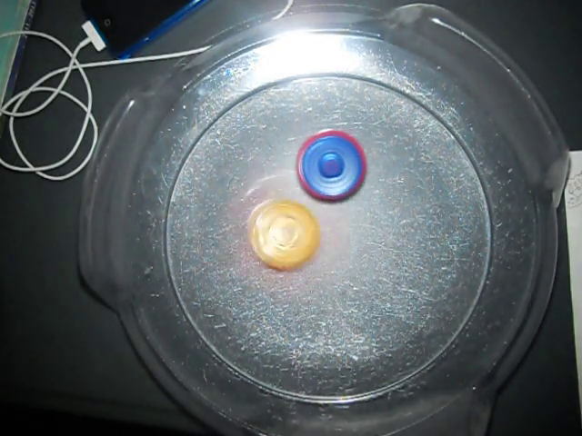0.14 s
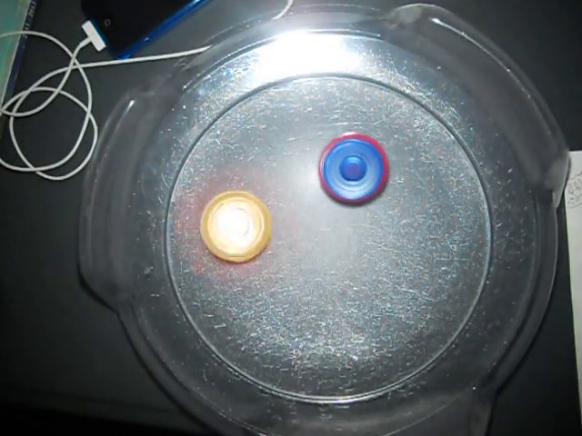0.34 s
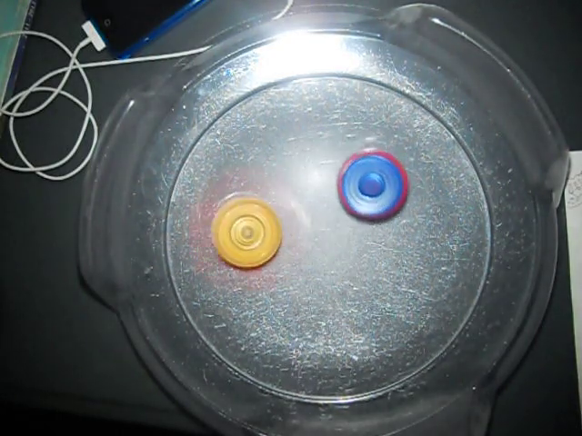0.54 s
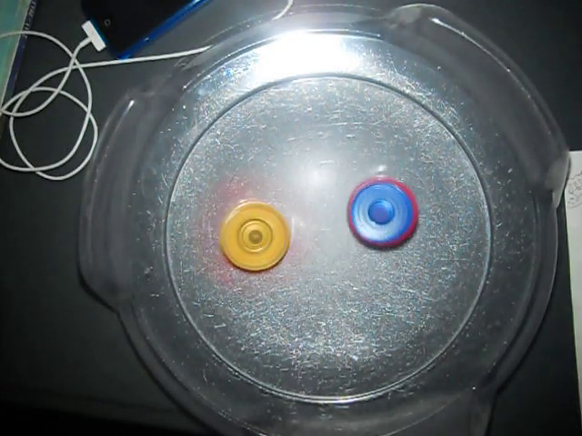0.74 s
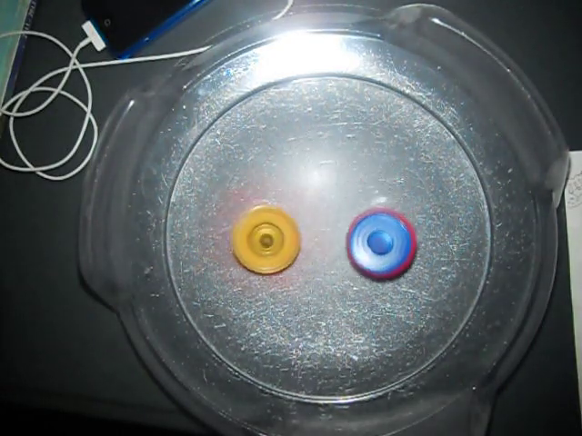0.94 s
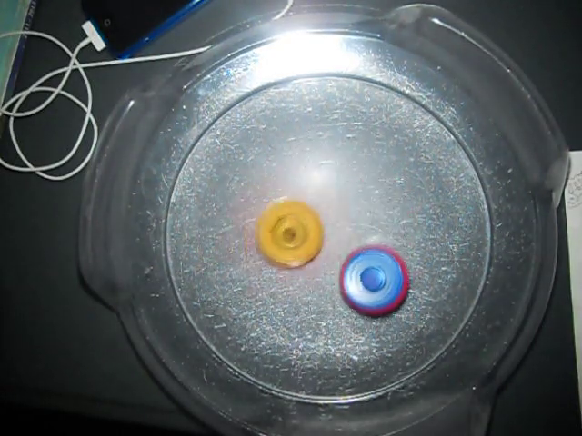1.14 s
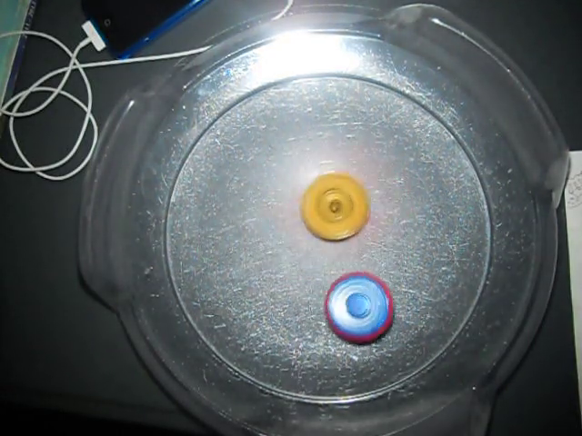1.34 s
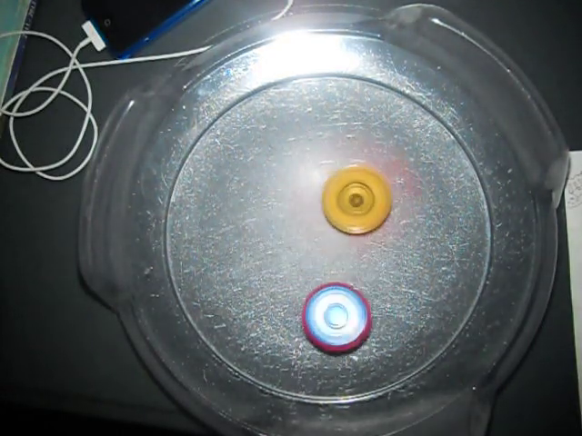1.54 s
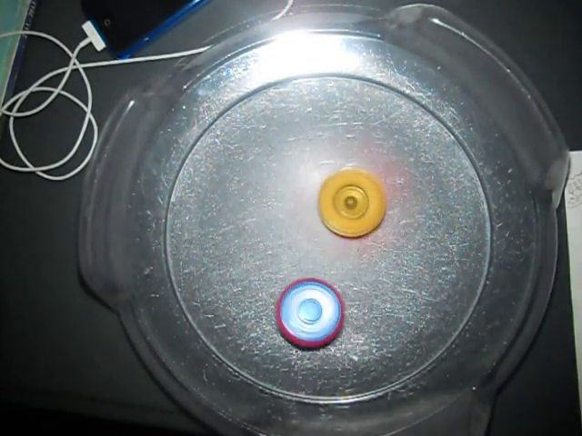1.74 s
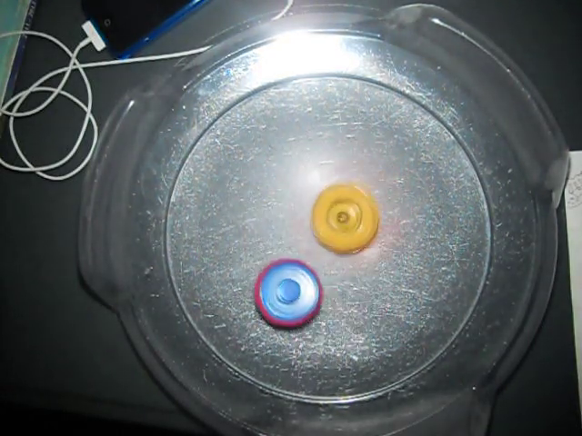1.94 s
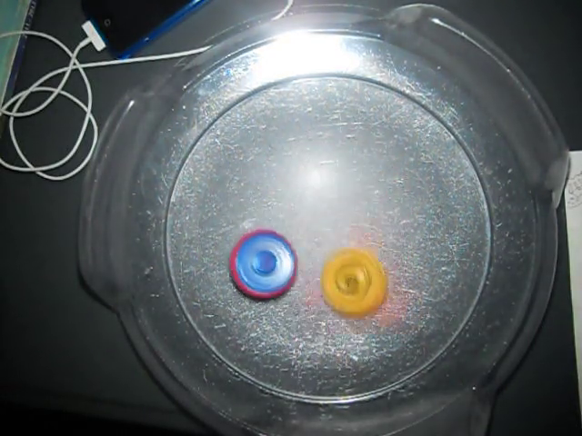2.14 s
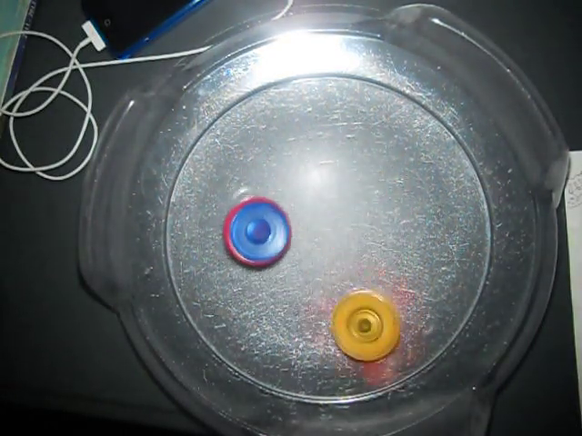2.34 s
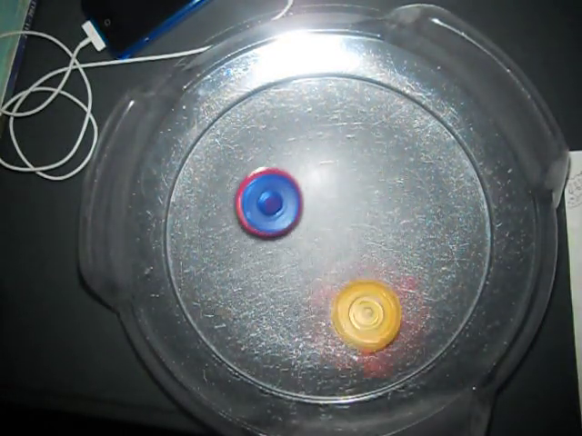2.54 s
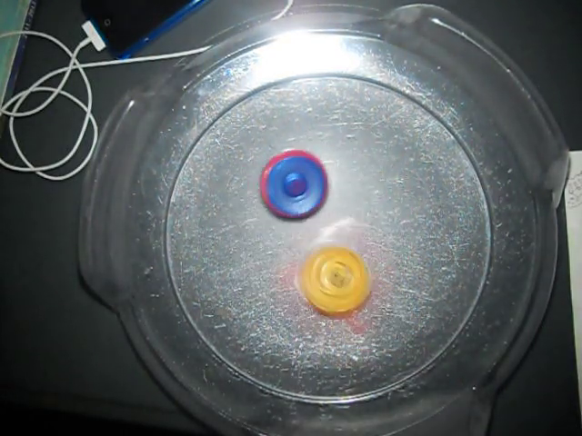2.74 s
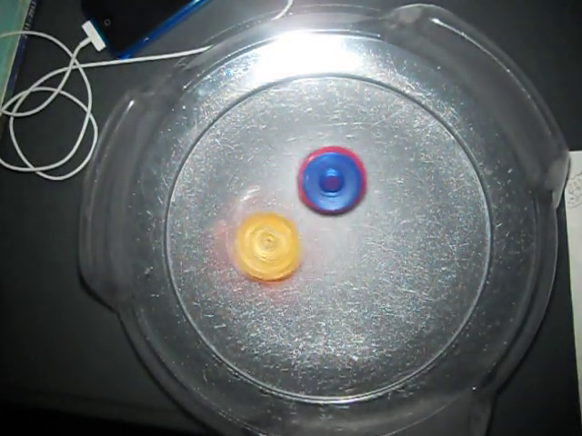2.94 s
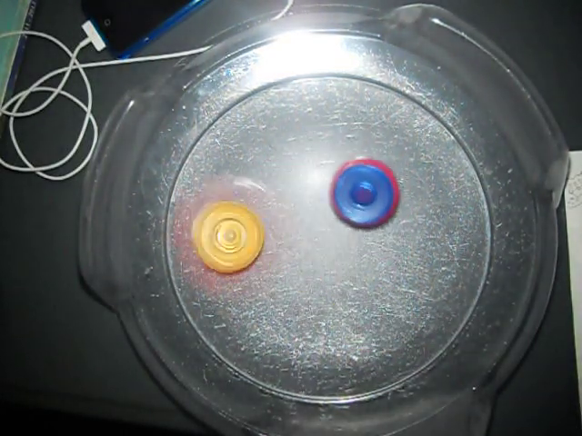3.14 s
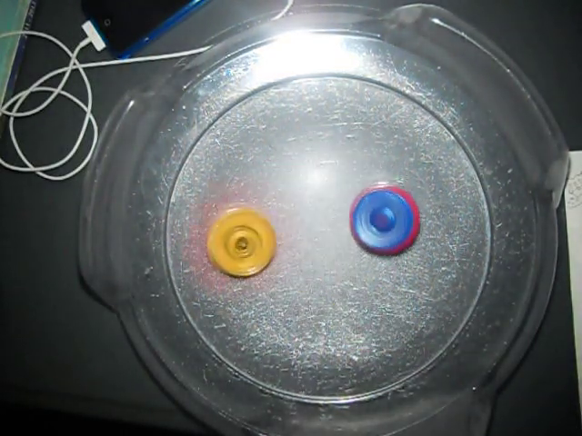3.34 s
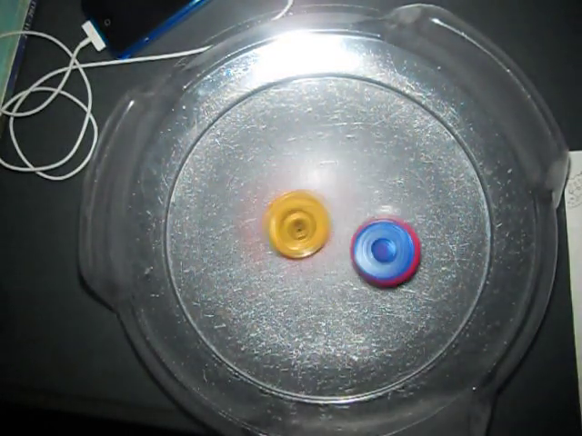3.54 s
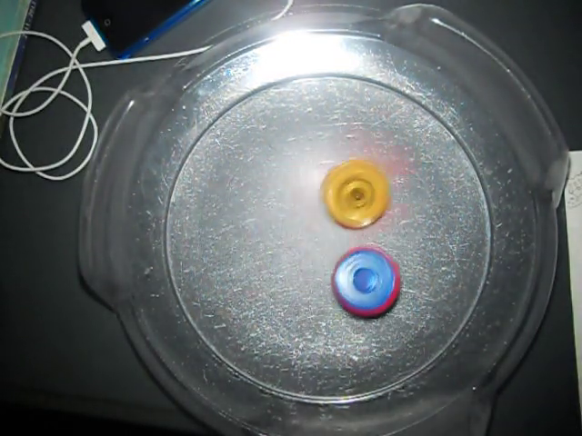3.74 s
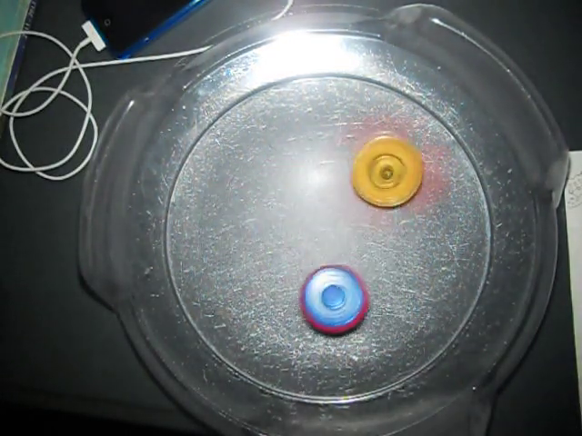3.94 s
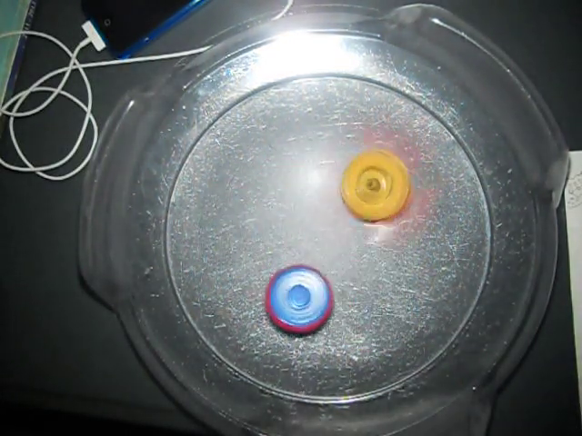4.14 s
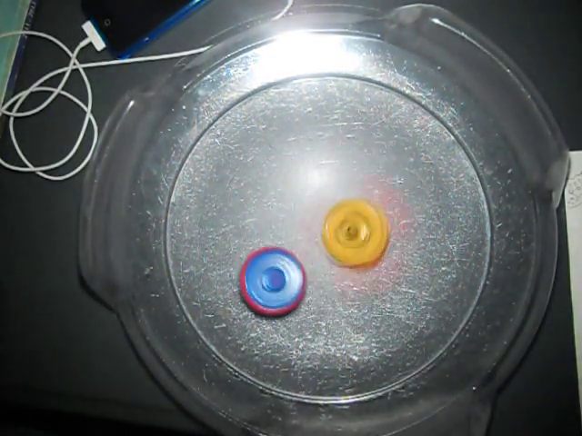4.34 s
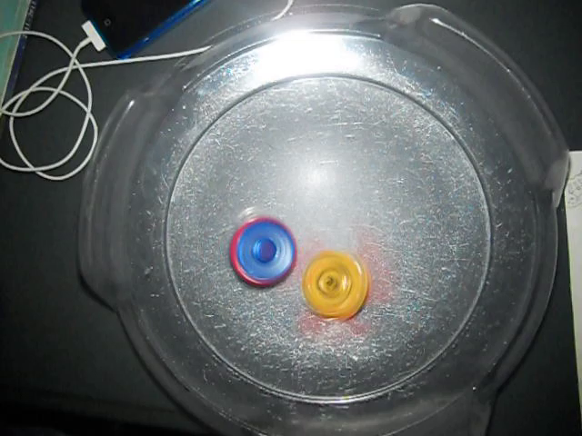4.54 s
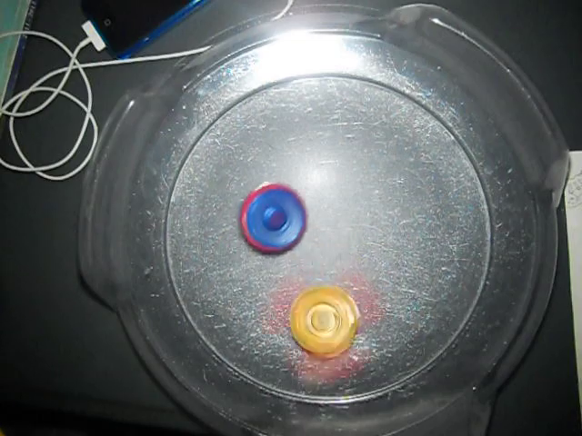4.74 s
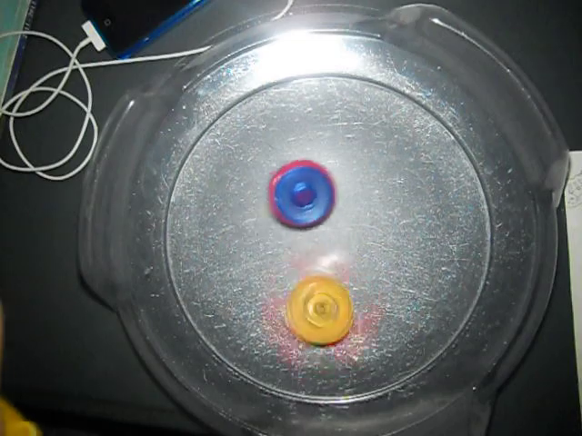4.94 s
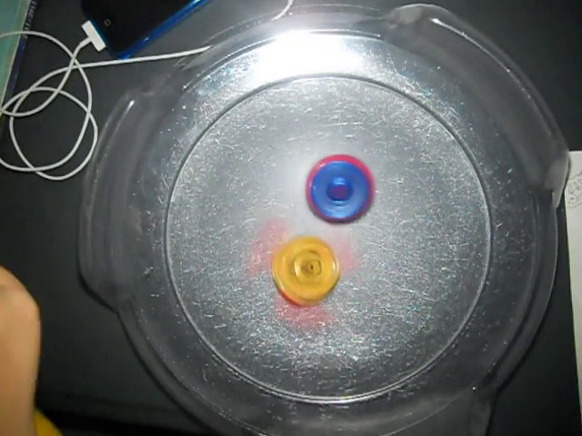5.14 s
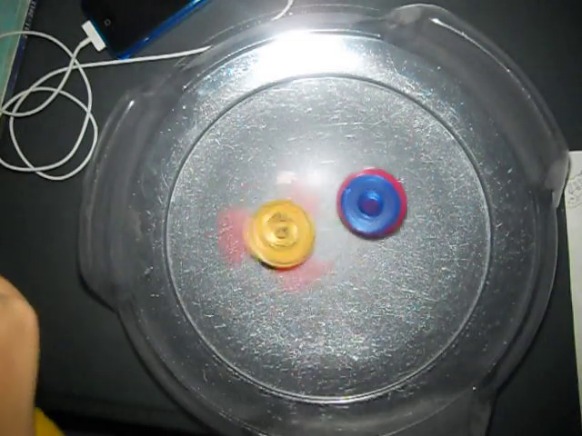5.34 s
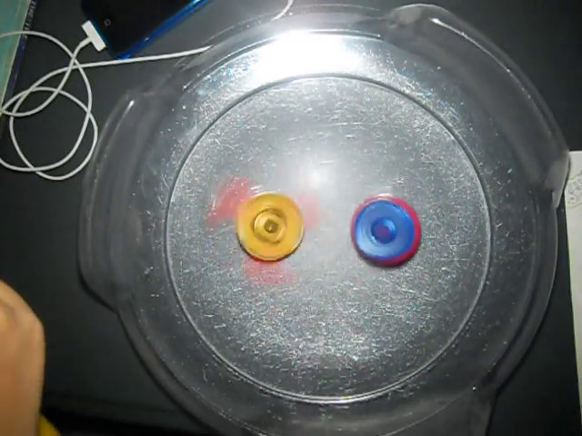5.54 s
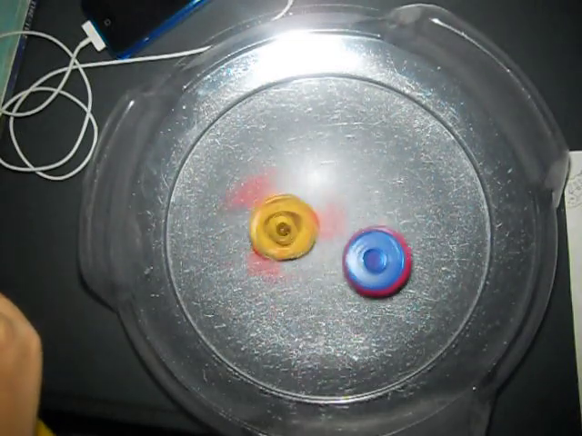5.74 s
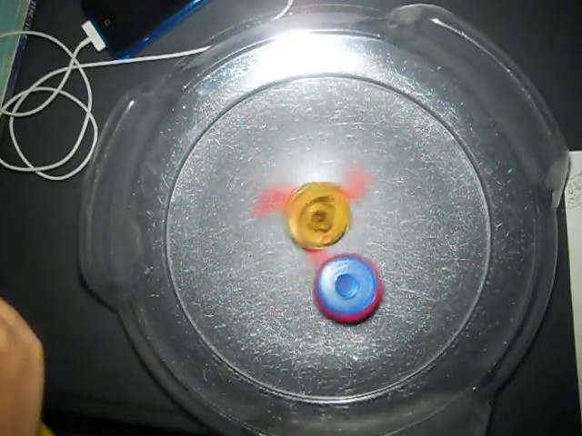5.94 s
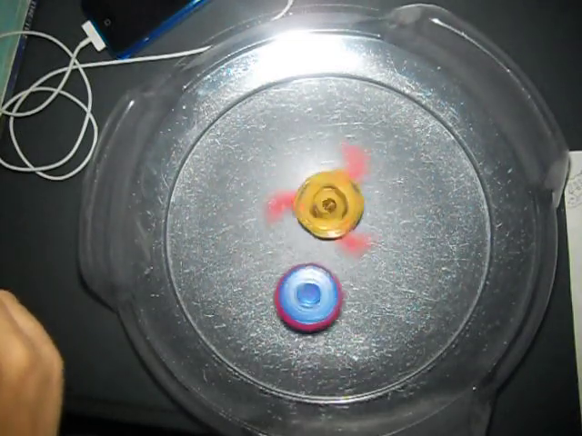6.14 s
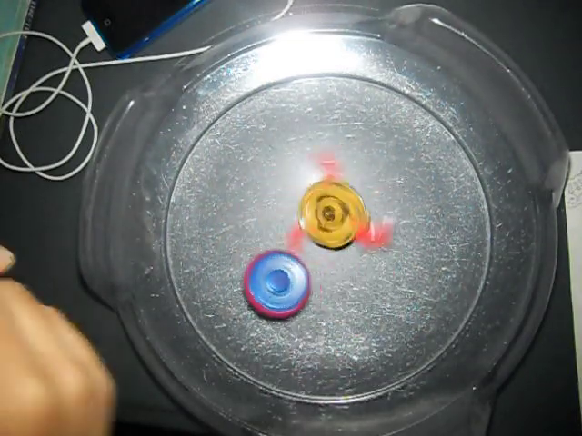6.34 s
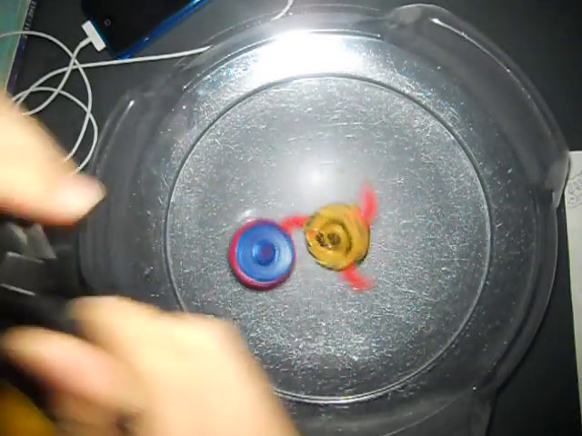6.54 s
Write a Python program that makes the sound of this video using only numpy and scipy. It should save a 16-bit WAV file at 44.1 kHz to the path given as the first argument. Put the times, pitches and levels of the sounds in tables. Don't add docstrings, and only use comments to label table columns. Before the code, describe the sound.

Very close up, small toy tops roll in a plastic bowl with an uneven hum, clashing in bright clacks and later hopping with light clicks.

```python
import sys
import numpy as np
from scipy import signal
from scipy.fft import rfft, irfft, next_fast_len
from scipy.io import wavfile
from scipy.ndimage import uniform_filter1d, map_coordinates

SR = 44100
rng = np.random.default_rng(int(sys.argv[2]) if len(sys.argv) > 2 else 0)


def digitize_waveform(pressure):
    field = np.atleast_2d(pressure).T
    bounded = np.clip(field, -1, 1)
    quanta = np.round(bounded * 32767).astype(np.int16)
    wavfile.write(sys.argv[1], SR, quanta)


def invert_db(level):
    return 10 ** (np.asarray(level, dtype=float) / 20)


N = 290178

# (t/s, peak level/dB, strongest ring f/Hz, contact t60/s, low-
# treble share/dB)
CLASH_BLOWS = [(1.0727, 1.5, 8300, 0.034, -14), (1.0787, -11.5, 4100, 0.016, -11),
               (1.0852, 0.5, 7690, 0.03, -11.5), (1.1004, -11.5, 6960, 0.047, -11.5),
               (1.1679, -5, 5640, 0.029, -16.5), (1.956, 1, 5700, 0.011, -10.5),
               (1.9703, -9.5, 5150, 0.031, -11), (1.9764, -5, 7350, 0.04, -14.5),
               (2.787, -1.5, 7900, 0.0294, -15), (2.8036, -11.5, 7600, 0.051, -12),
               (3.4291, -11.5, 2620, 0.025, -8.5), (3.522, -2.5, 7760, 0.0095, -28.5),
               (3.5263, -8, 3840, 0.033, -7.5), (3.5888, 2.5, 7690, 0.021, -18),
               (3.6223, -0.5, 5740, 0.02, -19), (5.116, -1.5, 7800, 0.035, -13.5),
               (5.761, -0.5, 8530, 0.021, -7.5), (5.907, -1, 6300, 0.032, -12),
               (6.459, -8.5, 5070, 0.027, -14.5), (6.4692, -8.5, 5030, 0.02, -16.5),
               (0.0426, -24.5, 2390, 0.023, -17.5), (0.125, -20.5, 4400, 0.019, -13),
               (0.186, -34, 4440, 0.023, -16), (4.4896, -20, 5740, 0.033, -7.5)]
# (f/Hz, width/Hz, level/dB)
RUBBED_BODY = [(1350, 270, 0.5), (2736, 460, 2.5), (4100, 690, -2.5), (5480, 1100, -2.5),
               (7800, 1200, -6.5)]


def unit(x):
    return x / np.sqrt(np.mean(x ** 2) + 1e-20)


def along(points, hz):
    f, v = np.transpose(points)
    return np.interp(np.log(hz + 1), np.log(f + 1), v)


def curves(rows):
    s, *cols = np.transpose(rows)
    return [np.interp(np.arange(N) / SR, s, c) for c in cols]


def wobble(rate):
    knots = rng.standard_normal(int(N * rate / SR) + 4)
    return map_coordinates(knots, [np.arange(N) * rate / SR])


def coloured(x, gain):
    m = next_fast_len(len(x) + 8192)
    cepstrum = irfft(np.log(gain(np.fft.rfftfreq(m, 1 / SR)) + 1e-6), m)
    cepstrum[1:m // 2] *= 2
    cepstrum[m // 2 + 1:] = 0
    return irfft(rfft(x, m) * np.exp(rfft(cepstrum)), m)[:len(x)]


def humps(modes, hz):
    return np.sqrt(sum(invert_db(2 * db) / (1 + (2 * (hz - c) / w) ** 2) for c, w, db in modes))


def grit(spread_db, size=N):
    strength_db = spread_db * np.minimum(rng.exponential(size=size), 3.5)
    return unit(rng.standard_normal(size) * invert_db(strength_db))


def add(into, s, sound):
    start = int(round(s * SR))
    into[start:start + len(sound)] += sound[:len(into) - start]


def ducking():
    # (t/s of the blow, depth/dB, recovery/s)
    dips = [
        (1.0743, 18, 0.041),
        (3.587, -8.5, 0.0069),
        (3.624, 8.5, 0.011),
        (5.117, 24.5, 0.024),
    ]
    t = np.arange(N) / SR
    depth_db = 0
    for s, db, recovery in dips:
        fall = np.clip((t - s + .006) / .0015, 0, 1)
        depth_db = depth_db + db * fall * np.exp(-np.clip(t - s, 0, 9) / recovery)
    return invert_db(-depth_db)


def loudness(layer):
    # (t/s, effort level/dB)
    skate = [(0, -74), (.4, -49), (.64, -40.5), (1.06, -37.5), (1.2, -54.5), (1.72, -68), (1.92, -49.5),
             (2.52, -73), (2.75, -52), (3.5, -40), (3.77, -56), (4.24, -61), (4.5, -44), (5.11, -42),
             (5.33, -52), (6.0, -51.5), (6.13, -58), (6.58, -53.5)]
    # (t/s, effort level/dB)
    press = [(0, -63), (0.659, -44), (1.06, -36), (1.24, -53), (1.7, -71), (1.93, -52.5), (2.5, -66),
             (2.75, -45.5), (2.9, -49), (3.3, -40), (3.518, -34.5), (3.75, -57.5), (4.27, -52), (4.45, -38),
             (5.12, -34), (5.35, -49), (6.0, -45), (6.15, -50.5)]
    # (t/s, effort level/dB)
    rock = [(0, -70), (.45, -61), (.65, -50.5), (.95, -51), (1.2, -66.5), (2.9, -67), (3.05, -50.5),
            (3.47, -42), (3.7, -61), (4.2, -62), (4.55, -46.5), (4.7, -51), (5.1, -41), (5.17, -62),
            (5.399, -56), (5.73, -56), (5.831, -78.5), (6.58, -73)]
    layers = {"rumble": (-52.5, 0.29, .5, 0.17, -64.5, 1.5),
              "grind": (-49, 0.9526, 0.0682, 0.09, -69.5, 1.5), "hiss": (-55, 0.84, 0.256, 0.0942, -73, .5),
              "boom": (-52.5, -0.05, 0.05, 1.03, -76, 1.5), "hum": (-49.5, 0.0045, 0.9623, 0.2, -72, 2)}
    db, *follows, idle_db, unsteady_db = layers[layer]
    middle_db = -50
    efforts = [curves(effort)[0] - middle_db for effort in (skate, press, rock)]
    moving = invert_db(db + np.dot(follows, efforts))
    return np.hypot(moving, invert_db(idle_db)) * invert_db(unsteady_db * wobble(7))


def shaken():
    out = np.zeros(N)
    t60 = 0.26
    dying = invert_db(-49.5 - 60 * np.arange(SR // 3) / SR / t60)
    for s, db, *_ in CLASH_BLOWS:
        add(out, s, invert_db(db) * dying)
    return out


def rolling():
    # (f/Hz, level/dB per Hz)
    rumble_tone = [(41, -30), (70, -5), (194, -1.5), (286, -1.5), (330, -9), (430, -31.5), (730, -120)]
    # (f/Hz, width/Hz, level/dB)
    foot_modes = [(127, 7.7, 7), (151.8, 1.3, 9.5)]
    # (f/Hz, level/dB per Hz)
    grind_tone = [(200, -26.5), (330, 0.5), (500, 4.5), (720, 6.5), (1000, 5), (1500, 0), (2000, -23),
                  (3000, -43.5)]
    # (f/Hz, level/dB per Hz)
    hiss_tone = [(1000, -27), (1700, -1), (1840, -2), (2100, -3.5), (3500, -6), (8070, -11), (10300, -15),
                 (11900, -39), (12400, -40.5), (12700, -69.5), (13000, -69)]
    chatter = 0.69 * wobble(25) + 0.4 * wobble(120)

    def rumble_gain(hz):
        return invert_db(along(rumble_tone, hz)) * (1 + humps(foot_modes, hz))

    def hiss_gain(hz):
        port_line = 1 + 1.5 / (1 + ((hz - 7860) / 60) ** 2)
        return invert_db(along(hiss_tone, hz)) * port_line

    rumble = unit(coloured(grit(4.5), rumble_gain))
    grind = unit(coloured(invert_db(chatter) * grit(1), lambda hz: invert_db(along(grind_tone, hz))))
    hiss = unit(coloured(invert_db(0.18 * chatter) * grit(2.2), hiss_gain))

    sway = np.sin(2 * np.pi * np.cumsum(55 + 3 * wobble(5)) / SR) * np.sqrt(2)
    thumps = unit(coloured(grit(1), lambda hz: humps([(70.0, 22, -2), (27, 16, -3)], hz) ** 2))
    boom = 0.96 * sway + thumps

    low = loudness("boom") * boom + loudness("rumble") * rumble
    return low + loudness("grind") * grind + loudness("hiss") * hiss


def hum():
    # (t/s, spin f/Hz)
    spin = [(0, 56.6), (1.05, 52.6), (1.2, 49.8), (1.65, 47.8), (1.95, 46.8), (2, 45.6), (2.45, 43.9),
            (2.75, 43), (3, 41.6), (3.3, 41), (4.1, 38.7), (5.05, 36.8), (5.4, 35.6), (5.9, 34.6),
            (6.2, 33.3), (6.58, 32.5)]
    # (t/s, f/Hz)
    loaded_mode = [(0, 380), (.6, 363), (1.05, 389), (2.7, 388), (3.0, 400), (3.5, 390.6), (4.1, 411),
                   (4.6, 420), (4.9, 388.3), (5.2, 405), (5.65, 355), (5.9, 382), (6.58, 411)]
    # (f/Hz, width/Hz, level/dB)
    bowl = [(50, 0), (520, 24, -8), (690, 190, -10)]
    (spin_hz,), (mode_hz,) = curves(spin), curves(loaded_mode)
    turn = 2 * np.pi * np.cumsum(spin_hz) / SR
    modes = [(mode_hz, *bowl[0])] + bowl[1:]
    drift = wobble(5.2)
    swell = invert_db(2 * drift)

    lines = np.zeros(N)
    for k in range(5, 22):
        level = humps(modes, k * spin_hz) ** 2 * np.roll(swell, k * SR)
        waver = .25 * np.roll(drift, -k * SR)
        lines += level * np.sin(k * turn + waver + 2 * np.pi * rng.random())
    lines = lines / np.sqrt(np.abs(uniform_filter1d(lines ** 2, size=SR // 8)))

    kicks = unit(coloured(grit(8.8), lambda hz: humps([(400, 84, 0.0031)], hz) ** 2))
    steady_share = 0.78
    tone = np.sqrt(steady_share) * lines + np.sqrt(1 - steady_share) * kicks
    beads = invert_db(2 * wobble(11))
    return (loudness("hum") + shaken()) * beads * tone


def clashes():
    # (t/s, peak level/dB,
    # strongest ring f/Hz)
    further_clashes = [(0.101, -36.5, 7570), (0.3203, -47, 2840), (0.6744, -31.5, 3270), (1.0493, -30, 2830),
                       (1.0632, -24.5, 2830), (1.134, -23, 7800), (1.33, -47, 2920), (2.492, -43.5, 4330),
                       (2.715, -45, 2810), (3.008, -40, 2720), (3.7805, -43, 4300), (3.837, -51, 2760),
                       (3.888, -58, 2660), (3.943, -26, 4550), (3.9653, -28, 2800), (4.3749, -28.5, 4200),
                       (4.585, -21.5, 3780), (4.6003, -24, 2600), (5.683, -46.5, 2440), (6.215, -49.5, 2500),
                       (6.433, -46, 3020)]
    # (f/Hz, width/Hz, level/dB)
    rim = [(2350, 68, -8.5), (3290, 47, -8), (4300, 390, -4), (5000, 200, -2), (5330, 140, -8.5),
           (5740, 450, -0.5), (6650, 150, 2.5), (7350, 600, -2), (9000, 170, -6)]
    # (f/Hz, level/dB, t60/s, held to at most 0.1 s)
    metal = [(2550, -11, 0.31), (2800, -6.5, 0.33), (3296, -12.5, 0.097), (4530, -8, 0.1),
             (5260, -8.5, 0.075), (5450, -8.5, 0.13), (6175, -22, 0.23), (6660, -22, 5.0),
             (7440, -4.5, 0.034), (9500, -7.5, 0.12)]
    # (f/Hz, level/dB per Hz)
    crack_tone = [(350, -51), (600, -12), (860, -14), (1860, -12), (2540, -2), (4140, -0.5), (7010, -3),
                  (7670, 0), (10400, -7), (12000, -38), (13000, -66)]
    # (f/Hz, t60/s)
    room = [(1000, 0.31), (3000, 0.23), (8000, 0.23), (12000, 0.29)]
    out, t = np.zeros(N), np.arange(SR // 4) / SR
    gain = np.pad(ducking(), (0, SR), "edge")

    blows = list(CLASH_BLOWS)
    for s, db, ring_hz in further_clashes:
        low_db = -13 - 0.08 * db - 8 * np.log2(ring_hz / 6000)
        blows.append((s, db, ring_hz, .022, low_db))

    for s, db, ring_hz, t60, low_db in blows:
        rebound = any(0 < s - before[0] < .025 for before in CLASH_BLOWS)
        tail_db = -19.5 - 0.13 * db - 6.5 * rebound
        strengths = [(c, w, level + 3 * rng.standard_normal()) for c, w, level in rim]
        strengths.append((ring_hz, 220, 5))

        def tilt(hz):
            return invert_db(along(crack_tone, hz) + (low_db + 12) / (1 + (hz / 4000) ** 6))

        def shape(hz):
            return tilt(hz) * (0.76 + humps(strengths, hz))

        def tail_shape(hz):
            return shape(hz) / (1 + (2150 / (hz + 1)) ** 10)

        crack = coloured(grit(3.0, size=len(t)) * invert_db(-60 * t / t60), shape)

        scatter = unit(coloured(grit(3.8, size=len(t)), tail_shape))
        hz, at, z = signal.stft(scatter, SR, nperseg=128)
        z = z * invert_db(-60 * at / along(room, hz)[:, None])
        tail = signal.istft(z, SR, nperseg=128)[1][:len(t)] * (1 - np.exp(-t / 0.0019))

        ring = np.zeros(len(t))
        for c, level, life in metal:
            decay = invert_db(level + 4 * rng.standard_normal() - 60 * t / min(life, .1))
            ring += decay * tilt(c) * np.sin(2 * np.pi * (c * t + rng.random()))
        tail = tail + 0.67 * ring * (1 - np.exp(-t / 0.0015))

        later = gain[int(s * SR):][:len(t)]
        squeeze = np.minimum(later / later[0], 1)
        blow = 1.194 * crack / np.abs(crack).max() + invert_db(tail_db - 5.5) * tail
        add(out, s, invert_db(db) * squeeze * blow)
    return out


def ticks():
    # (t/s, peak level/dB)
    rattles = [
        (1.783, -60.5),
        (1.805, -66),
        (1.8433, -54),
        (1.8627, -52),
        (1.9064, -42.5),
        (1.929, -47),
        (2.1867, -57),
        (2.204, -77),
        (2.663, -68.5),
        (2.6882, -65),
    ]
    out, t = np.zeros(N), np.arange(SR // 10) / SR
    for s, db in rattles:
        modes = [(5700, 120, 0), (rng.uniform(6100, 7600), 200, -6), (3300, 300, -12)]
        noise = rng.standard_normal(len(t))
        ring = unit(coloured(noise, lambda hz: humps(modes, hz) * (hz < 10000)))
        add(out, s, invert_db(db - 60 * t / .05) * ring * (1 - np.exp(-t / .001)))
    return out


def grazes():
    # (start t/s, end t/s, level/dB)
    strokes = [
        (3.439, 3.46, -25),
        (3.486, 3.526, -27.5),
        (3.913, 3.938, -50.5),
        (3.936, 4.002, -42.5),
        (4.529, 4.571, -38),
        (4.57, 4.584, -37),
        (4.584, 4.606, -25),
    ]
    t = np.arange(N) / SR
    stroke = np.zeros(N)
    for start, end, db in strokes:
        onset = np.clip((t - start) * 500, 0, 1)
        stroke += invert_db(db) * onset * invert_db(-60 * np.clip(t - end, 0, 1) / 0.088)

    def body(hz):
        return humps(RUBBED_BODY, hz) * (hz < 11000) / (1 + (hz / 8500) ** 6)

    slips = invert_db(2.2 * wobble(600)) * grit(4)
    return stroke * unit(coloured(slips, body))


def bounces():
    # (t/s, peak level/dB, click level/dB, upper modes level/dB, favoured mode f/Hz)
    landings = [(3.63, -23.5, -1.5, 8.5, 988), (4.375, -32, -22, 6.5, 1320), (4.448, -13.5, -10, -3, 1060),
                (4.533, -34, -1, -8, 646), (5.102, -18, -31.5, -5.5, 510), (5.167, -16, -10.5, -2.5, 450),
                (5.225, -17, -12, -8.5, 520), (5.276, -22.5, -8, -3, 518), (5.71, -22.5, -4, 5.5, 640),
                (5.837, -23.5, -11.5, -2, 1600), (5.916, -23.5, 3, 5, 1480), (5.959, -23.5, -8, 2, 1665),
                (6.296, -26.5, -7, 2, 1590), (6.55, -22.5, -11, 1, 630)]
    # (f/Hz, level/dB, t60/s)
    dish = [(402.7, -3, 0.11), (516, -12.5, 0.058), (640, -15.5, 0.073), (805, -13, 0.075),
            (1043, -10.5, .04), (1320, -12.5, 0.065), (1555, -9.5, 0.042), (2390, -23, .03)]
    out, t = np.zeros(N), np.arange(SR // 5) / SR
    for s, db, click_db, upper_db, spot_hz in landings:
        ring = np.zeros(len(t))
        for hz, level, t60 in dish + [(spot_hz, -8, .035)]:
            level_db = level + upper_db * (hz > 500) + 2.5 * rng.standard_normal()
            detuned_hz = hz * (1 + 0.021 * rng.standard_normal())
            ring += invert_db(level_db - 60 * t / t60) * np.sin(2 * np.pi * detuned_hz * t)
        ring *= 1 - np.exp(-t / .001)
        scuff = grit(2, size=len(t)) * invert_db(-60 * t / 0.053)
        click = coloured(scuff, lambda hz: humps(RUBBED_BODY, hz) * (hz < 11000))
        click = click / np.abs(click).max()
        add(out, s, invert_db(db) * (0.79 * ring + invert_db(click_db + 4.5) * click))
    return out


def scene():
    steady = ducking() * (rolling() + hum())
    return (steady + clashes() + bounces() + ticks() + grazes())[None]


def top_cut(x):
    return signal.sosfilt(signal.butter(12, 13220, fs=SR, output="sos"), x)


def record(dry):
    x = dry[0] / (1 + np.abs(dry[0] / .79) ** 5) ** (1 / 5)
    mix = coloured(x, lambda hz: 1 / (1 + (hz / 12200) ** 40))[None]
    return top_cut(mix)


dry = scene()
out = record(dry)
digitize_waveform(out)
```